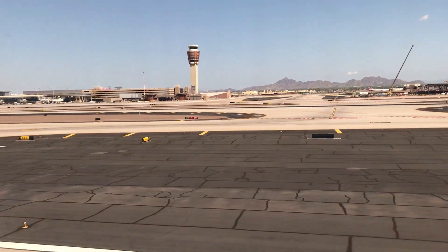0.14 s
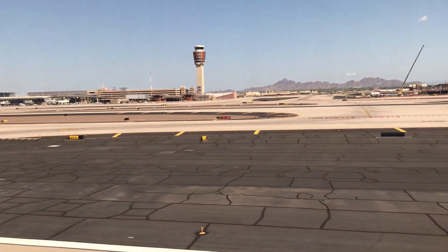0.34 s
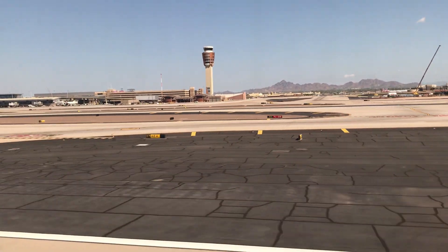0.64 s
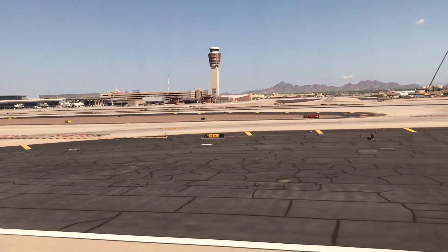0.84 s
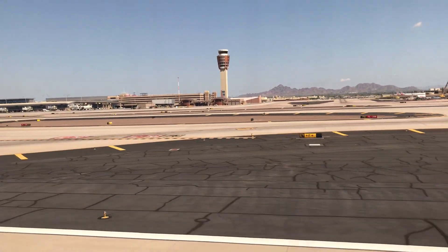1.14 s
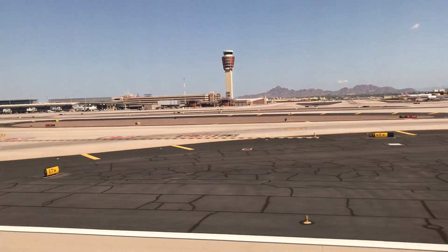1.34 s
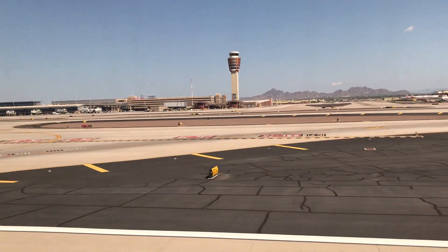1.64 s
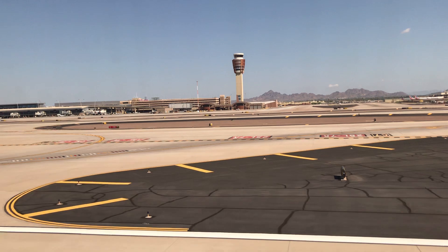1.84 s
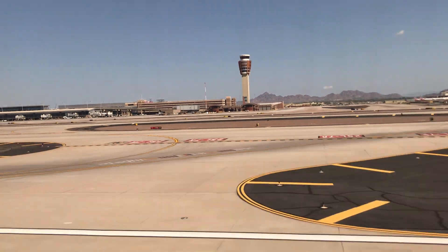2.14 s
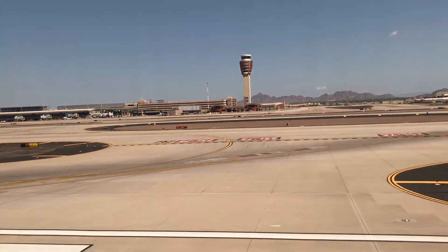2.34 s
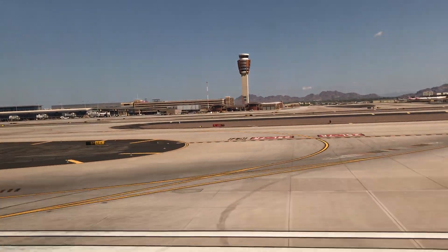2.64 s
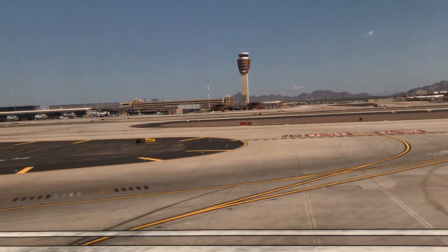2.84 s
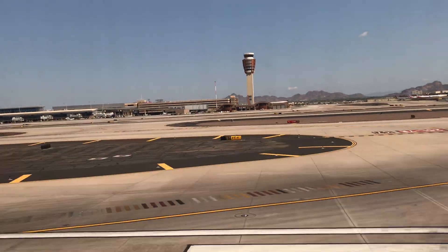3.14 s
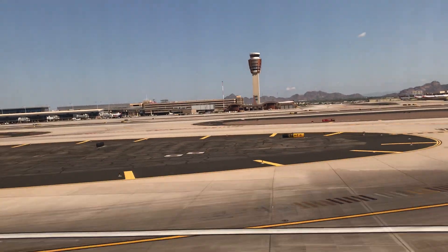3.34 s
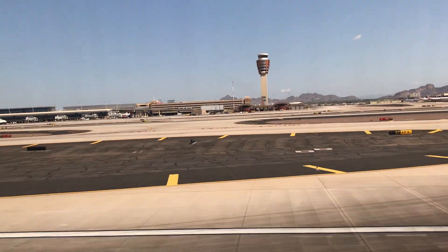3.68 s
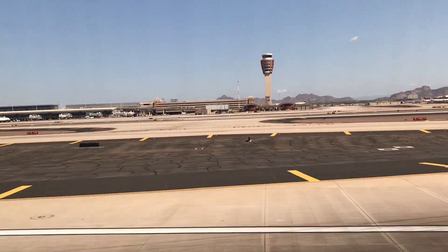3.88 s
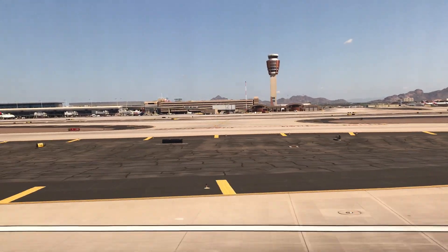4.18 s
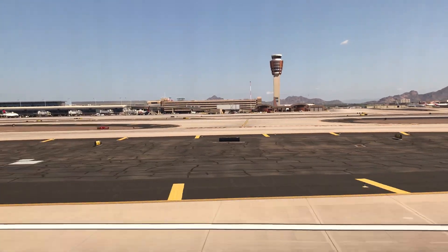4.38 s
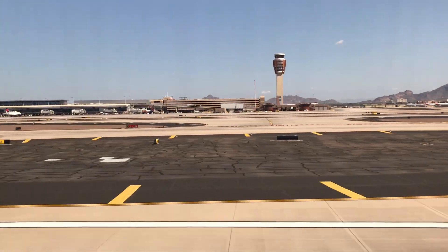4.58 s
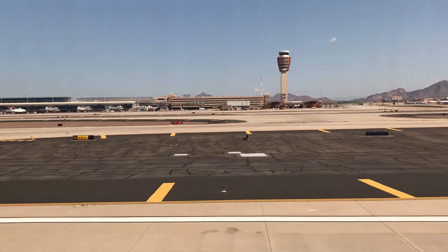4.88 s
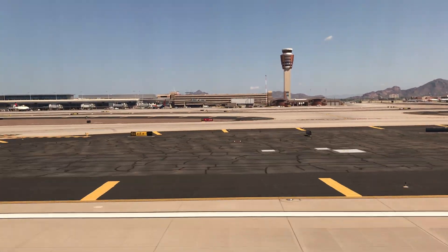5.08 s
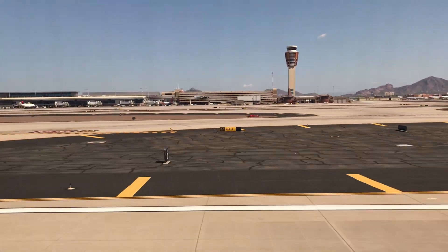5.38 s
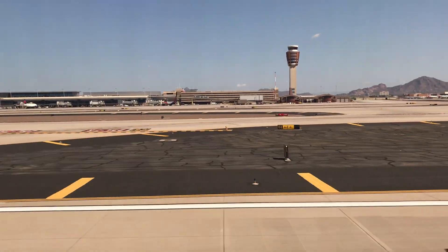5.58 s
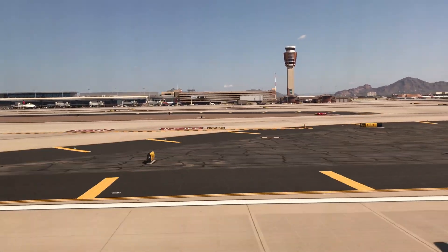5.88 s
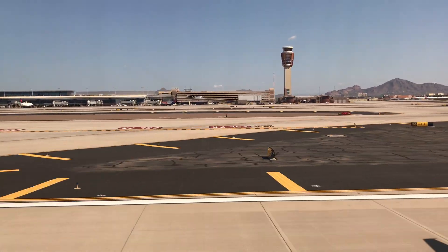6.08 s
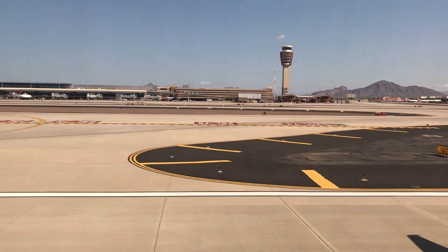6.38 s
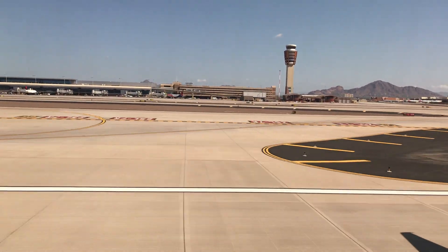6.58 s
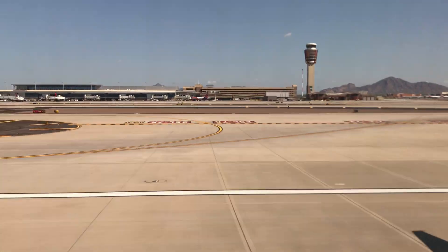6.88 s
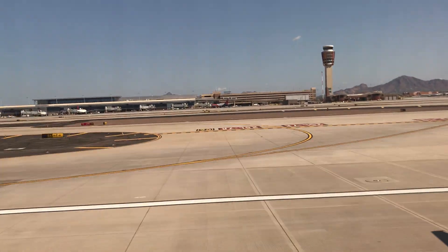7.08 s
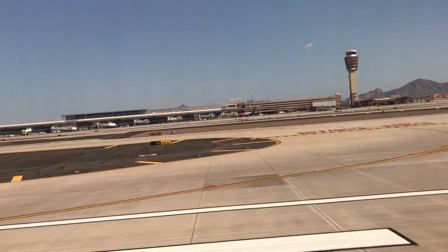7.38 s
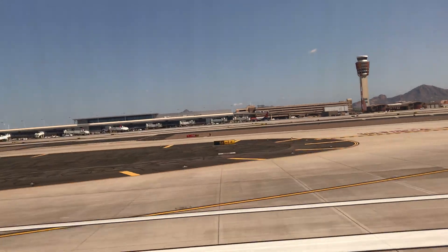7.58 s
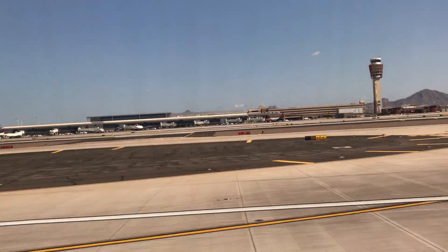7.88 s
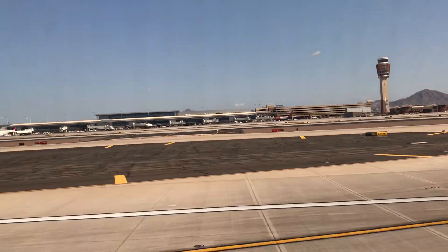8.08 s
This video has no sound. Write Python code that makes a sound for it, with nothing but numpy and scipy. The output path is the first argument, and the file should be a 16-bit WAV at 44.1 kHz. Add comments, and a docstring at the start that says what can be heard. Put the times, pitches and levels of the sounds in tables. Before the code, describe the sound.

Inside a jet airliner rolling on the ground, a deep, unsteady boom and floor rumble dominate, with muffled vent hiss and thin, wavering engine whines above. A few faint plastic ticks come early. Past the six-second mark, a cluster of soft thumps and trim rattle shakes the cabin; the level ducks briefly and the low boom continues stronger. Close, dry window-seat microphone, single channel.

```python
"""A deep boom and rumble under vent hiss: a jet airliner taxiing across an apron, from a window seat.
Shaped noise makes the rolling wheels, vents, blurred engine tones and hums; wavering sines make the whines.
Late on, jolts thump the cabin (soft pushes ringing low modes) and the trim scuffs and rattles (grainy noise).
The recorder's gain ducks at the jolts, and the boom stays stronger afterwards."""
import sys
import numpy as np
from scipy import signal
from scipy.fft import rfft, irfft, next_fast_len
from scipy.io import wavfile
from scipy.ndimage import uniform_filter1d

SR = 44100
rng = np.random.default_rng(int(sys.argv[2]) if len(sys.argv) > 2 else 0)


def store_pcm(level_fs):
    """Save levels as 16-bit WAV."""
    pcm = np.round(np.clip(level_fs, -1, 1) * 32767).astype(np.int16)
    wavfile.write(sys.argv[1], SR, np.atleast_2d(pcm).T)


N = 362502
TIME = np.arange(N) / SR


def from_db(db):
    """Decibels to gain."""
    return 10 ** (np.asarray(db) / 20)


def rms_one(x):
    """Scale to unit power."""
    return x / np.sqrt(np.mean(x ** 2) + 1e-20)


def in_time(rows):
    """Each column of a curve after its time column, joined by straight lines at every sample."""
    seconds, *columns = np.transpose(rows)
    return [np.interp(TIME, seconds, column) for column in columns]


def shaped_noise(gain_at, size=N):
    """Unit-power noise whose spectrum follows gain_at(Hz)."""
    padded = next_fast_len(size)
    hz = np.maximum(np.fft.rfftfreq(padded, 1 / SR), 1)
    spectrum = rfft(rng.standard_normal(padded)) * gain_at(hz)
    return rms_one(irfft(spectrum, padded)[:size])


def colour(points, hz):
    """Gain of a spectrum table, falling 12 dB per octave below its first point and above its last."""
    at, db = np.transpose(points)
    ends = np.minimum(hz / at[0], 1) * np.minimum(at[-1] / hz, 1)
    return from_db(np.interp(np.log(hz), np.log(at), db)) * ends ** 2


def resonance(hz, centre, width):
    """Gain of a steep-sided resonance, 1 on top; width is in Hz, about 3 dB down."""
    return 1 / (1 + ((hz ** 2 - centre ** 2) / (hz * width * np.pi / 2)) ** 2)


def drift(rate):
    """Slow chance with spread 1, its swings mostly slower than rate in Hz."""
    return shaped_noise(lambda hz: 1 / (1 + (hz / rate) ** 2))


def evened(x, seconds):
    """Take out level swings slower than the given time."""
    return x / np.sqrt(uniform_filter1d(x ** 2, max(int(seconds * SR), 2)) + 1e-6)


# Spectrum of the vents and engine wash at the seat. Each row: frequency in Hz, relative density in dB.
AIR_SPECTRUM = [(150, 6.5), (380, 2.5), (490, -4), (570, -5.5), (720, -9), (1500, -13), (2150, -20),
                (4200, -25), (4950, -28.5), (6400, -29), (7600, -33.5), (9500, -35.5), (10500, -41.5),
                (11500, -38.3), (15500, -39)]
# The wash swells slowly. Each row: time in seconds, level in dB rms.
AIR_SWELL = [(0, -36.5), (.6, -37.5), (1.0, -36), (1.6, -37), (2.3, -37.5), (4, -38), (6.3, -37.5),
             (7.25, -39), (7.9, -36.8), (8.22, -37.3)]
# Broad engine tones through the cabin wall. Each row: centre in Hz, width in Hz, level in dB rms.
WALL_TONES = [(572, 44, -54.5), (974, 32, -60), (1387, 24, -62.5), (1430, 40, -63), (1692, 43, -65),
              (3495, 45, -70.5)]


def air(flutter_db):
    """Turbulent air makes the vent hiss and engine wash; the engines' blurred tones are narrow noise bands."""
    level_db, = in_time(AIR_SWELL)
    hiss = shaped_noise(lambda hz: colour(AIR_SPECTRUM, hz))
    wash = from_db(level_db + flutter_db * drift(4)) * hiss
    tones = sum(from_db(db) * shaped_noise(lambda hz: resonance(hz, centre, width))
                for centre, width, db in WALL_TONES)
    return wash + tones


# Narrow hums in the cabin. Each row: start in seconds, length in seconds, centre in Hz,
# level at the top of the swell in dB rms.
CABIN_HUMS = [(-.7, 1.6, 562, -52), (-.4, .9, 1042, -60), (1.15, .75, 578, -49.5), (2.0, 1.35, 1048, -56.5),
              (3.05, 2.4, 1103, -58)]


def hums(width_hz):
    """Narrow noise bands, heard as wavering tones, swell and fade; neighbours may overlap."""
    out = 0
    for start, length, centre, db in CABIN_HUMS:
        progress = np.clip((TIME - start) / length, 0, 1)
        swell = np.sqrt(np.abs(np.sin(np.pi * progress)))
        out = out + from_db(db) * swell * shaped_noise(lambda hz: resonance(hz, centre, width_hz))
    return out


def whine(pitch_hz, level_db, wander, waver_db):
    """A machine's steady tone, wavering in pitch (wander is a fraction) and in strength."""
    phase = 2 * np.pi * np.cumsum(pitch_hz * (1 + wander * drift(25))) / SR
    return np.sqrt(2) * from_db(level_db + waver_db * np.tanh(drift(25))) * np.sin(phase)


LOWER_FAN_HZ, UPPER_FAN_HZ = 2514.3, 6602
# Strength of the fan's lower whine. Each row: time in seconds, level in dB rms before it swells and wavers.
LOWER_FAN_LEVEL = [(0, -64.5), (.35, -59.7), (1.4, -60.2), (1.72, -55.5), (1.97, -59.5), (2.26, -69),
                   (2.6, -61), (3.2, -72), (3.7, -69), (6.4, -66), (7.2, -72), (8.22, -65.5)]
FAN_SWELL_DB, FAN_SWELL_HZ = .8, 5
# The upper whine: its mean level, and the share of the lower one's swing in dB that it follows.
UPPER_FAN_DB, UPPER_FAN_FOLLOWS = -76, .3
# A faint high whistle. Each row: time in seconds, pitch in Hz, level in dB rms, both before wavering.
HIGH_WHISTLE = [(0, 15700, -95), (1.7, 15700, -85), (2.3, 15400, -81), (2.9, 15330, -78), (4.3, 15580, -84),
                (5.2, 15580, -82), (6.2, 15480, -77), (8.22, 15550, -85)]
# A faint whine that sinks away. Each row: time in seconds, base rate in Hz,
# level of each harmonic in dB rms, both before wavering.
SINKING_WHINE = [(0, 3960, -78), (.35, 3875, -75), (.7, 3820, -86), (1.2, 3790, -110)]


def whines():
    """Fans and pumps turn at nearly steady rates and sing thinly above the hiss."""
    lower_db = in_time(LOWER_FAN_LEVEL)[0] + FAN_SWELL_DB * drift(FAN_SWELL_HZ)
    upper_db = UPPER_FAN_DB + UPPER_FAN_FOLLOWS * (lower_db - lower_db.mean())
    lower_fan = whine(LOWER_FAN_HZ, lower_db, wander=0.00065, waver_db=3.5)
    upper_fan = whine(UPPER_FAN_HZ, upper_db, wander=0.00042, waver_db=1.5)
    base_hz, sinking_db = in_time(SINKING_WHINE)
    sinking = sum(whine(harmonic * base_hz, sinking_db, wander=.004, waver_db=1.0) for harmonic in (2, 3))
    whistle_hz, whistle_db = in_time(HIGH_WHISTLE)
    whistle = whine(whistle_hz, whistle_db, wander=.004, waver_db=2.0)
    return lower_fan + upper_fan + sinking + whistle


# Fuselage resonances that boom around the seat. Each row: centre in Hz, width in Hz, relative level in dB.
FUSELAGE_MODES = [(41.7, 4.5, -20), (63.05, 10.4, -4.5)]
# Spectrum of the floor rumble. Each row: frequency in Hz, relative density in dB.
FLOOR_SPECTRUM = [(20, -42), (35, -15.5), (60, -12.5), (84, -0.5), (100, 0), (128, 0), (150, -1), (190, -5),
                  (232, -16.5), (290, -16.5), (380, -30.5), (600, -43)]
# How hard the pavement shakes the fuselage, rougher after the jolt. Each row: time in seconds, boom in dB.
BOOM_STRENGTH = [(0, -26), (1.25, -26), (1.7, -22.5), (2.35, -24), (2.88, -30), (3.1, -21), (3.4, -24),
                 (4.9, -25), (5.75, -29.5), (5.9, -21), (6.1, -31), (6.36, -28.5), (6.48, -16.5),
                 (7.1, -21.5), (7.26, -13), (7.76, -17), (7.96, -12.5), (8.22, -15)]
# How hard the wheels shake the floor. Each row: time in seconds, rumble in dB.
RUMBLE_STRENGTH = [(0, -25.5), (.45, -23.5), (1.4, -24), (1.65, -26.5), (2.9, -24), (3.45, -25),
                   (5.15, -24.3), (5.7, -26), (6.45, -24), (6.62, -18), (6.85, -20), (7.05, -27),
                   (7.85, -22.7), (8.22, -25.3)]


def rolling():
    """The tyres shake the airframe at random: the fuselage booms at low modes, the floor rumbles more broadly."""
    boom_db, = in_time(BOOM_STRENGTH)
    rumble_db, = in_time(RUMBLE_STRENGTH)
    boom = shaped_noise(lambda hz: sum(from_db(db) * resonance(hz, centre, width)
                                       for centre, width, db in FUSELAGE_MODES))
    rumble = shaped_noise(lambda hz: colour(FLOOR_SPECTRUM, hz))
    return from_db(boom_db) * evened(boom, seconds=.11) + from_db(rumble_db) * evened(rumble, seconds=0.18)


# Jolts through the floor under the seat. Each row: start in seconds, relative level in dB,
# push length in seconds.
JOLTS = [(6.578, -2.5, 0.0068), (6.609, -2, 0.0043), (6.646, -2.5, 0.0081), (6.696, -0.5, .0046),
         (6.80, -8, .0044), (6.851, -3, 0.006), (6.912, 1.5, .012)]
# What a jolt sets ringing. Each row: frequency in Hz, relative level in dB, time to die by 60 dB in seconds.
JOLT_MODES = [(63.2, 1.5, 0.34), (121.3, -2, 0.36), (158.6, -8.5, 0.17)]


def thumps():
    """Each jolt is a soft push that rings the cabin's low modes."""
    push = np.zeros(N)
    for start, db, length in JOLTS:
        pulse = np.hanning(max(int(length * SR), 3))
        push[int(start * SR):][:len(pulse)] += from_db(db) * pulse / pulse.sum()
    t = TIME[:SR]
    body = sum(from_db(db - 60 * t / t60) * np.sin(2 * np.pi * hz * t) for hz, db, t60 in JOLT_MODES)
    return signal.fftconvolve(push, body)[:N]


# Colour of the plastic trim beside the seat. Each row: frequency in Hz, relative density in dB.
TRIM_SPECTRUM = [(150, -14), (450, -1), (1300, 0), (2500, -4), (4400, -8.5), (6400, -9.5), (7800, -14.5),
                 (9300, -15), (10500, -19), (12000, -16), (15500, -17)]


def trim_colour(hz, tilt_db, knee_hz=1400):
    """The trim's spectrum, made brighter or duller above a knee by tilt_db per octave."""
    return colour(TRIM_SPECTRUM, hz) * from_db(tilt_db * np.log2(np.hypot(1, hz / knee_hz)))


def slips(grain_db, size=N):
    """Rubbing plastic catches and lets go hundreds of times a second: a rough gain."""
    return from_db(grain_db * shaped_noise(lambda hz: 1 / (1 + (hz / 350) ** 2), size=size))


# The trim chatters while the jolts go on. Each row: time in seconds, level in dB,
# brightness in dB per octave.
TRIM_RATTLE = [(6.40, -90, -3), (6.47, -46, -3), (6.505, -35.5, -2.5), (6.535, -37, -2), (6.565, -45, -2.5),
               (6.62, -40.5, -2), (6.77, -43.5, -4.5), (6.83, -40, -5), (6.88, -45, -5), (6.94, -45, -3.5),
               (7.02, -56, -3.5), (7.2, -90, -3)]


def rattle(grain_db, uneven_db):
    """The loose trim chatters densely, its brightness mixed from a dull and a bright noise."""
    level_db, tilt_db = in_time(TRIM_RATTLE)
    dull = shaped_noise(lambda hz: trim_colour(hz, tilt_db.min()))
    bright = shaped_noise(lambda hz: trim_colour(hz, tilt_db.max()))
    bright_share = (tilt_db - tilt_db.min()) / (np.ptp(tilt_db) + 1e-9)
    chatter = np.sqrt(bright_share) * bright + np.sqrt(1 - bright_share) * dull
    return from_db(level_db + uneven_db * drift(45)) * rms_one(slips(grain_db) * chatter)


# Ticks and scuffs of plastic trim. Each row: start in seconds, level in dB before it dies away,
# rubbing time in seconds, brightness in dB per octave, ring of the touched part in Hz.
TRIM_SCUFFS = [(.411, -56, .004, 1.5, 7500), (.725, -48, 0.011, 0, 4400), (.775, -47, .011, -1, 4400),
               (.863, -55.5, .006, 5, 6800), (.916, -47.5, .028, -4.5, 2700), (1.536, -42, .012, 1, 2100),
               (2.595, -58, .025, 2.5, 6300), (2.902, -54, .005, 3, 13000), (3.877, -47.5, .011, -2, 3350),
               (4.944, -47.5, .007, -.5, 3600), (6.422, -50, .04, 0, 2600), (6.475, -43.5, .02, 3.5, 4000),
               (6.515, -31.5, 0.011, -2.5, 1000), (6.546, -39, .008, .5, 3200),
               (6.575, -30.5, 0.018, 1, 1100), (6.611, -35.5, .005, -1.5, 3200),
               (6.659, -43.5, .012, 4.5, 13000), (6.68, -46, .035, 1.5, 3500),
               (6.706, -37, 0.028, -5.5, 1200), (6.801, -42.5, .026, -2, 5800),
               (6.9, -37.5, .016, -5, 2010), (6.926, -42.5, .009, 3, 6500), (7.001, -47.5, .007, 3.5, 9000),
               (7.069, -46, .008, 3.5, 4000), (7.135, -50, .018, -2, 3800), (7.378, -56, .005, 5, 6000),
               (7.521, -52, .016, -2.5, 4500), (7.549, -37.5, .018, -10, 2000),
               (7.700, -45, 0.034, .5, 3600), (7.833, -53, 0.06, .5, 3000), (7.881, -51, .012, 3.5, 2800),
               (8.163, -49, .006, 4, 4400)]
# How far a part's own ring stands out under a light touch, and the dB it loses per dB of harder contact.
LIGHT_TOUCH_DB, RING_DB, RING_LOSS = -47, 8, 0.8
# Time to die by 60 dB under a light touch, and the extra time for every dB harder.
SCUFF_T60_S, SCUFF_T60_S_PER_DB = 0.065, .003
# Time a touch takes to build up, halved for every so many dB per octave of brightness.
SCUFF_RISE_S, RISE_HALVING_DB = .004, 5


def scuffs(grain_db, ring_share):
    """Plastic rubs in a quick run of tiny slips, then dies away; ring_share is ring width over pitch."""
    out, t = np.zeros(N + SR), TIME[:SR // 2]
    for start, db, rub, tilt_db, ring_hz in TRIM_SCUFFS:
        # a light touch brings out one part's ring; a hard one shakes the whole trim, and for longer
        hard_db = max(db - LIGHT_TOUCH_DB, 0)
        ring = from_db(RING_DB - RING_LOSS * hard_db)
        t60 = SCUFF_T60_S + SCUFF_T60_S_PER_DB * hard_db

        def touched_colour(hz):
            """The trim's colour with the touched part's ring standing out."""
            return trim_colour(hz, tilt_db) * (1 + ring * resonance(hz, ring_hz, ring_share * ring_hz))

        scuff = shaped_noise(touched_colour, size=len(t))
        rise = SCUFF_RISE_S * 2 ** (-tilt_db / RISE_HALVING_DB)
        shape = np.minimum(t / rise, 1) * from_db(db - 60 * np.maximum(t - rub, 0) / t60)
        out[int(start * SR):][:len(t)] += shape * rms_one(slips(grain_db, size=len(t)) * scuff)
    return out[:N]


CABIN_T60_S, CABIN_DB = .3, -9


def cabin(x):
    """Seats and carpet leave only a short diffuse tail."""
    t = TIME[:SR // 2]
    tail = rng.standard_normal(len(t)) * from_db(-60 * t / CABIN_T60_S)
    return x + from_db(CABIN_DB) * signal.fftconvolve(x, tail / np.linalg.norm(tail))[:N]


def scene():
    """Everything that reaches the window seat, in one channel."""
    plastic = cabin(scuffs(grain_db=2.3, ring_share=0.17) + rattle(grain_db=2.2, uneven_db=1.8))
    background = air(flutter_db=0.49) + hums(width_hz=5.5) + whines()
    return (background + rolling() + thumps() + plastic)[None]


RELEASE_DB_PER_S = 3.5


def gain_control(x, ceiling_db, window_s):
    """The gain drops as the short-term level passes the ceiling, and creeps back up."""
    size = int(window_s * SR)
    level_db = 10 * np.log10(uniform_filter1d(x[0] ** 2, size) + 1e-12)
    over_db = np.maximum(level_db - ceiling_db, 0)
    release_db = RELEASE_DB_PER_S * TIME
    held_db = np.maximum.accumulate(over_db + release_db) - release_db
    return x * from_db(-uniform_filter1d(held_db, size))


LOW_CUT_HZ, CUTOFF_HZ = 34, 15780
PEAK_DB = -2.7  # level that the rounded peaks approach


def record(dry):
    """The microphone's low cut, gain control and rounded peaks, short fades at both ends, then the top is cut."""
    low_cut = signal.butter(6, LOW_CUT_HZ, "high", fs=SR, output="sos")
    top_cut = signal.ellip(12, .1, 90, CUTOFF_HZ, fs=SR, output="sos")
    heard = signal.sosfilt(low_cut, dry)
    steady = gain_control(heard, ceiling_db=-9.8, window_s=0.056)
    rounded = steady / (1 + (steady / from_db(PEAK_DB)) ** 10) ** (1 / 10)
    from_ends_s = np.minimum(TIME, TIME[::-1])
    fade = np.sin(np.pi / 2 * np.minimum(from_ends_s / .005, 1)) ** 2
    return signal.sosfilt(top_cut, rounded * fade)


dry = scene()
out = record(dry)
store_pcm(out)
```